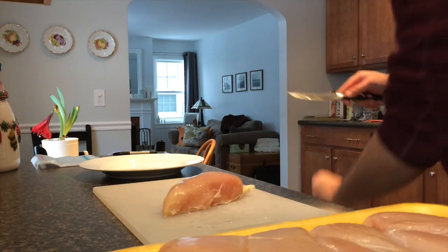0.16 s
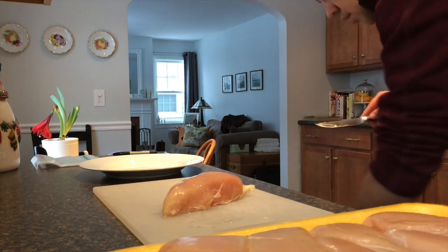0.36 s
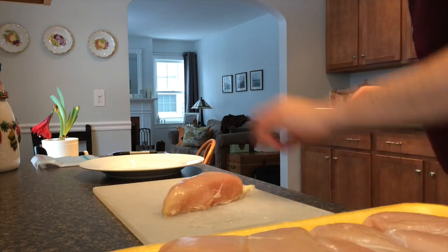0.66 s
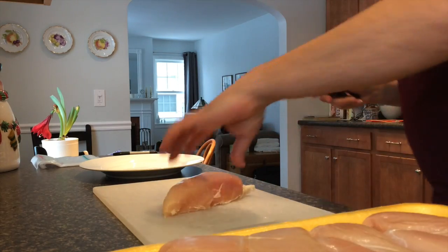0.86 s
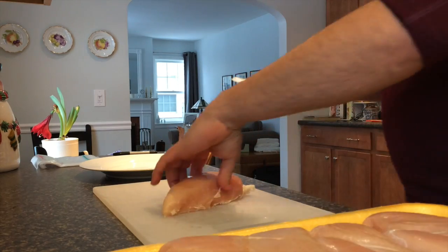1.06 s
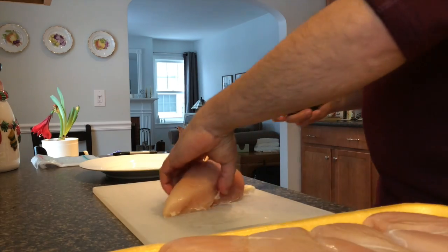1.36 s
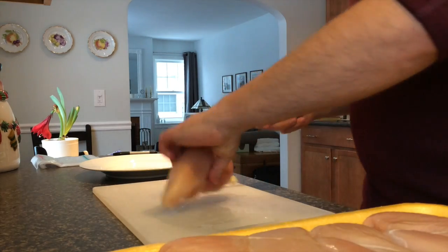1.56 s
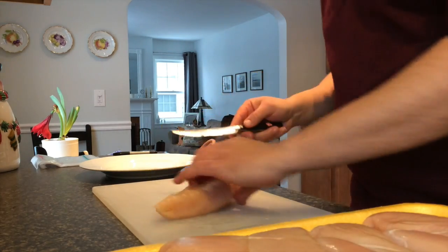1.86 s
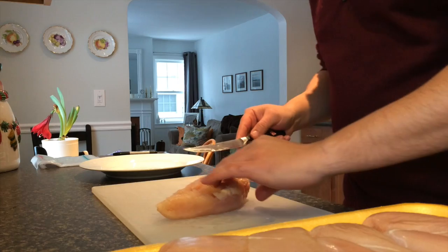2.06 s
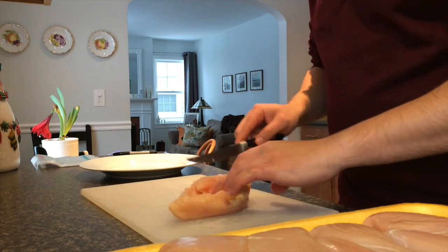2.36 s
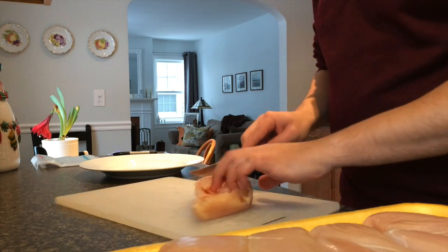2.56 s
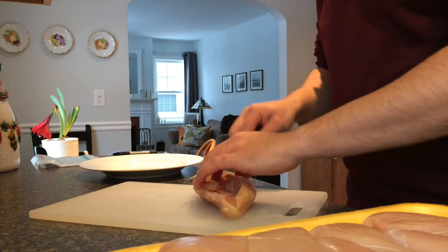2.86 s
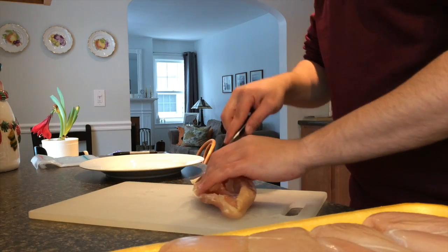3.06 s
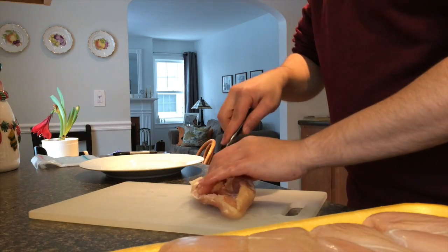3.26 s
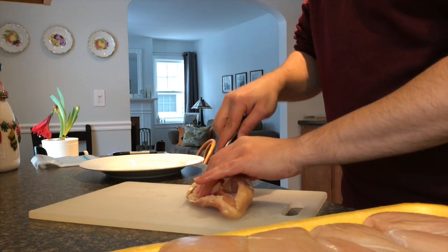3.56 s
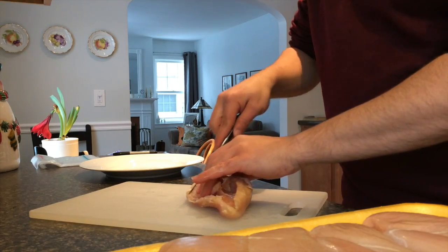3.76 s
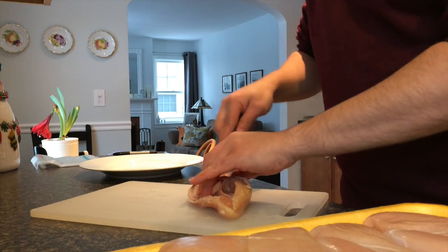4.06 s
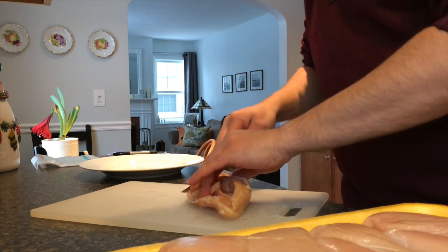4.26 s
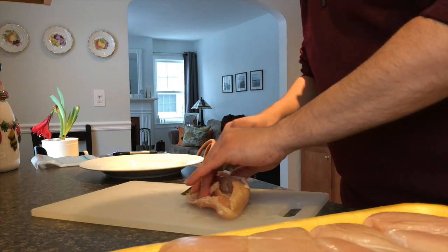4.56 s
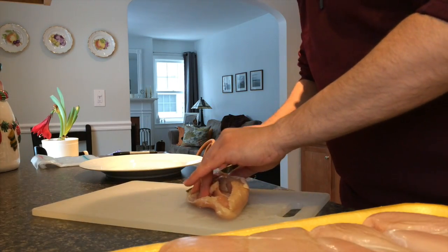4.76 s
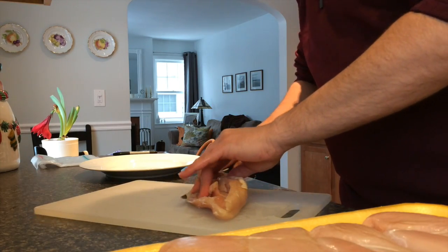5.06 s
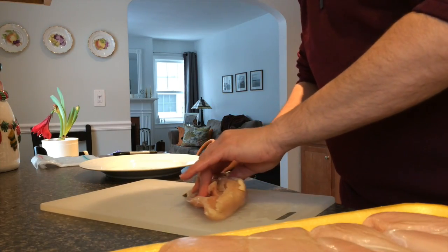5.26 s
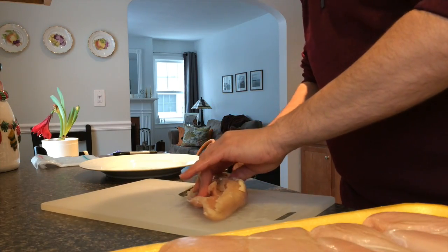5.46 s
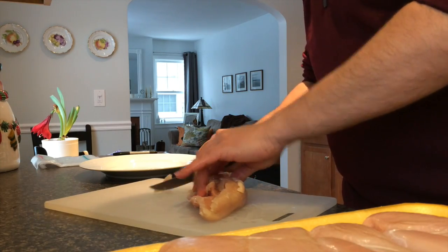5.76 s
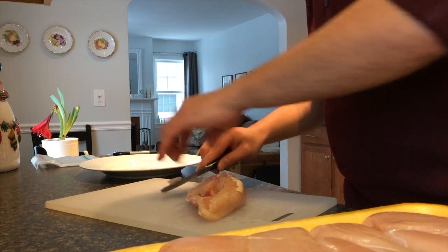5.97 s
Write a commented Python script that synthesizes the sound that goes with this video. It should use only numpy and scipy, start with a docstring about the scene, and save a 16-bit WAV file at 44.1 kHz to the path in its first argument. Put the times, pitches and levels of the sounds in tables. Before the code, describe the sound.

In a quiet kitchen with a faint low appliance hum, shoes knock and a scrap crumples a bin liner. Raw chicken is peeled up and slapped on a plastic board. Close, sticky ticks and soft slicing follow, then a dull thump, bright sinew snaps, light drags and one hard ringing knife scrape.

```python
"""A knife slices wetly into raw chicken, snaps a sinew, drags on a plastic board and ends with one hard scrape.
The cook peels the meat off and slaps it down, shifts his feet and drops a scrap into a bin liner; an appliance hums.
Slices are hiss around a sinking pitch; pops and snaps are struck resonances; the scrape rings board and blade modes.
Smears, drags, steps and crumples are coloured random clicks, smacks are noise bursts, thumps are decaying sines.
Filtered noise makes the clothes, air and hum; a diffuse kitchen echo is mixed in."""
import sys
import numpy as np
from scipy import signal
from scipy.fft import rfft, irfft
from scipy.io import wavfile

SR = 44100
rng = np.random.default_rng(int(sys.argv[2]) if len(sys.argv) > 2 else 0)


def dump(signal):
    """Clip the signal to [-1, 1] and save it as 16-bit WAV at the path in sys.argv[1]."""
    limited = np.clip(np.atleast_2d(signal).T, -1, 1)
    pcm = np.round(limited * 32767).astype(np.int16)
    wavfile.write(sys.argv[1], SR, pcm)


N = 270333
TIME = np.arange(N) / SR
CUTOFF_HZ = 15600


def from_db(db):
    """Decibels to gain."""
    return 10 ** (np.asarray(db) / 20)


def rms_one(x):
    """Scale to unit rms."""
    return x / np.sqrt(np.mean(x ** 2) + 1e-20)


def at_hz(points, hz):
    """Read a table on a log-frequency axis."""
    known_hz, values = np.transpose(points)
    return np.interp(np.log(np.maximum(hz, 1)), np.log(known_hz), values)


def add(out, start_s, sound):
    """Mix a short sound in at start_s."""
    start = int(start_s * SR)
    out[start:start + len(sound)] += sound[:N - start]


def butter(x, order, edge_hz, kind="low"):
    """Butterworth filter."""
    return signal.sosfilt(signal.butter(order, edge_hz, kind, fs=SR, output="sos"), x)


def colour(x, spectrum, size=4096):
    """Minimum-phase filter with the given spectrum; white noise keeps its power."""
    bin_hz = np.arange(size // 2 + 1) * SR / size
    gain = rms_one(from_db(at_hz(spectrum, bin_hz)))
    # fold the cepstrum to make the filter causal
    cepstrum = irfft(np.log(gain))
    cepstrum[1:size // 2] *= 2
    cepstrum[size // 2 + 1:] = 0
    impulse = irfft(np.exp(rfft(cepstrum)))
    return signal.fftconvolve(x, impulse)[:N]


def resonance(x, hz, width_hz):
    """Two-pole band-pass with gain 1 on top."""
    r = np.exp(-np.pi * width_hz / SR)
    feed = np.array([1, 0, -1]) * (1 - r * r) / 2
    back = [1, -2 * r * np.cos(2 * np.pi * hz / SR), r * r]
    return signal.lfilter(feed, back, x + 1e-18)


def grains(per_s, spread_db):
    """Random tiny clicks of uneven size; rms 1."""
    sizes = from_db(spread_db * np.minimum(rng.exponential(1, N), 4))
    signs = rng.choice([-1, 1], N)
    return rms_one(sizes * signs * (rng.random(N) < per_s / SR))


def uneven(per_s, depth_db):
    """A randomly wavering gain of rms 1."""
    knots = rng.standard_normal(int(TIME[-1] * per_s) + 2)
    waver = np.interp(TIME * per_s, np.arange(len(knots)), knots)
    return rms_one(from_db(depth_db * waver))


def swell(peak_s, level_db, length_s, rise_share):
    """A gesture grows smoothly to its peak, then loses 20 dB per length_s; rise_share is a share of length_s."""
    rise_db = 10 * ((TIME - peak_s) / (rise_share * length_s)) ** 2
    fall_db = 20 * (TIME - peak_s) / length_s
    below_db = np.where(TIME < peak_s, rise_db, fall_db)
    return from_db(level_db - np.minimum(below_db, 100))


def swells(rows, rise_share):
    """Gestures of one shape, added in power."""
    return np.sqrt(sum(swell(s, db, length_s, rise_share) ** 2 for s, db, length_s in rows))


def burst(t60_s):
    """A puff of noise that dies away."""
    t = np.arange(int(t60_s * SR) + 2) / SR
    return rng.standard_normal(len(t)) * from_db(-60 * t / t60_s)


def pop(hz, width_hz, spray_db, spray_s):
    """A film or fibre breaks: one sharp crack and a brief noise spray excite a resonance; height 1."""
    force = from_db(spray_db) * burst(spray_s)
    force[0] = 1
    crack = resonance(force, hz, width_hz)
    return crack / np.max(np.abs(crack))


def kitchen_echo(build_s):
    """Diffuse reflections build up, then die at a rate set by frequency; unit energy."""
    # reverberation: hz, t60_s
    room_t60 = [(100, 0.25), (500, 0.3651), (2000, 0.3865), (4000, 0.3579), (8000, 0.2367), (15000, 0.1)]
    t = np.arange(SR // 2) / SR
    edges_hz, tail = np.geomspace(40, 18000, 13), 0
    for low, high in zip(edges_hz, edges_hz[1:]):
        band = butter(rng.standard_normal(len(t)), 2, [low, high], "band")
        tail = tail + band * from_db(-60 * t / at_hz(room_t60, np.sqrt(low * high)))
    tail = tail * (1 - np.exp(-(t / build_s) ** 2))
    return tail / np.sqrt(np.sum(tail ** 2))


def background(air_db):
    """Still room air is coloured noise; an appliance's unsteady low hum is noise through narrow resonances."""
    # air spectrum: hz, relative_db
    air_spectrum = [(25, -18), (60, -6.5), (170, -5), (224, -9.5), (440, -16.5), (770, -23), (2700, -28.5),
                    (6000, -31.5), (15000, -35.5)]
    # appliance hum: pitch_hz, width_hz (of each of two passes), level_db
    hum_bands = [(69.33, 27, -79), (146.62, 25, -74.5), (168.01, 12, -76)]
    hum = 0
    for hz, width_hz, db in hum_bands:
        once = resonance(rng.standard_normal(N), hz, width_hz)
        hum = hum + from_db(db) * rms_one(resonance(once, hz, width_hz))
    return hum + from_db(air_db) * rms_one(colour(rng.standard_normal(N), air_spectrum))


def footsteps():
    """Shoes knock on the floor: dense clicks with a very fast rise."""
    # knocks: peak_s, level_db, length_s
    knock_rows = [(.039, -66, 0.0799), (.28, -58, 0.05142)]
    # floor spectrum: hz, relative_db
    floor_spectrum = [(100, -4.5), (250, 10.5), (450, 0.5), (850, 0), (1400, -1.5), (2500, -12.5),
                      (6000, -36), (15000, -28.5)]
    return swells(knock_rows, rise_share=0.03967) * colour(grains(per_s=3600, spread_db=2.5), floor_spectrum)


def clothes():
    """Clothes rustle as he turns: soft coloured noise."""
    # rustles: peak_s, level_db, length_s
    rustle_rows = [(.075, -75.5, 0.04), (.335, -74.5, 0.2483)]
    rustle = colour(rng.standard_normal(N), [(300, -1.5), (4000, -6.5), (15000, -18.5)])
    return swells(rustle_rows, rise_share=0.4838) * rustle


def bin_liner():
    """A scrap crumples the bin liner: dense uneven clicks."""
    # crumples: peak_s, level_db, length_s
    crumple_rows = [(.554, -44, 0.081736), (.585, -52.5, 0.10645)]
    # liner spectrum: hz, relative_db
    liner_spectrum = [(70, -20), (135, -9), (250, -4), (380, -20.5), (520, -4), (620, -17.5), (700, -2.5),
                      (800, -9), (1100, -9.5), (2800, -9), (7000, -11), (15000, -17.5)]
    return swells(crumple_rows, rise_share=0.20164) * colour(grains(per_s=6000, spread_db=3.5), liner_spectrum)


def thumps(contact_s):
    """A soft push sets the board and, if heavy, the counter swinging for a few low cycles."""
    # weight landing on board and counter: start_s, level_db, pitch_hz
    landings = [(1.1, -45.5, 109.3), (1.537, -50, 151), (1.872, -45.5, 136.4), (1.8972, -37.5, 139.3),
                (1.957, -48.5, 135.5), (4.461, -50.5, 130.4), (4.9339, -41, 119), (4.95, -41, 122)]
    # bending modes of the loaded board: pitch_ratio, relative_db
    bending_modes = [(1, 0), (1.87, -8.5)]
    cycles_to_60db = 11.102
    counter_hz, counter_db = 57, -42  # boom under the hardest landing
    counter_growth = 3.5  # dB of boom per dB of landing
    out, t = np.zeros(N), np.arange(SR // 2) / SR
    hardest_db = max(db for _, db, _ in landings)
    for s, db, hz in landings:
        modes = [(ratio * hz, db + mode_db) for ratio, mode_db in bending_modes]
        modes.append((counter_hz, counter_db + counter_growth * (db - hardest_db)))
        for mode_hz, level_db in modes:
            decay = from_db(level_db - 60 * mode_hz * t / cycles_to_60db)
            swing = decay * np.sin(2 * np.pi * mode_hz * t)
            add(out, s, -swing * (1 - np.exp(-t / contact_s)))
    return out


def smacks():
    """Wet contacts of meat and blade with the board are short noise bursts; the lighter, the duller."""
    # smacks: start_s, level_db
    smack_rows = [(1.106, -60.5), (1.211, -62.5), (1.8694, -56.5), (1.8924, -42.5), (3.829, -57),
                  (4.24, -57), (4.343, -55.5), (4.934, -52.5)]
    # contact spectrum: hz, relative_db
    contact_spectrum = [(400, 0), (850, -6.5), (1400, 2), (1950, -5.5), (2800, 0.5), (3800, -4.5),
                        (5150, -1), (6100, -13.5), (7100, -5), (9000, -16.5), (15000, -6)]
    edge_hz, edge_at_db, db_per_octave = 1583.5, -58, 5.5  # treble edge at a reference level
    out = np.zeros(N)
    for s, db in smack_rows:
        treble_hz = min(edge_hz * 2 ** ((db - edge_at_db) / db_per_octave), CUTOFF_HZ)
        add(out, s, from_db(db) * butter(burst(t60_s=0.050965), 1, treble_hz))
    return colour(out, contact_spectrum)


def drags():
    """Edge and meat drag lightly on the board: clicks of wavering strength."""
    # drags: peak_s, level_db, length_s
    drag_rows = [(1.54, -66, 0.07807), (4.24, -81, 0.289), (4.47, -72.5, 0.0639), (4.88, -77.5, 0.1565),
                 (4.98, -62.5, 0.10393), (5.20, -61, 0.13313), (5.30, -62.5, 0.07396), (5.41, -67.5, .15),
                 (5.485, -61.5, 0.069), (5.53, -61, 0.08007), (5.703, -55.5, 0.05232)]
    # drag spectrum: hz, relative_db
    drag_spectrum = [(40, -11.5), (100, 2.5), (200, -13), (280, -3), (400, -12.5), (600, 0), (900, -12),
                     (1280, -11.5), (1680, -16.5), (2080, -12), (2740, -14), (3500, -21), (12000, -32.5)]
    friction = grains(per_s=4000, spread_db=2.5) * uneven(per_s=70, depth_db=2.5)
    return swells(drag_rows, rise_share=0.43396) * colour(friction, drag_spectrum)


def wet_meat(pop_db):
    """Sticky surfaces tick under the fingers and crackle finely as they slide, with single pops on top."""
    # meat sliding, peeling and parting: peak_s, level_db, length_s
    smear_rows = [(1.29, -76, 0.343), (1.55, -65.5, 0.1078), (1.90, -67, 0.07944), (2.27, -76, 0.1198),
                  (2.56, -76, 0.1452), (3.5, -71, 0.1933), (3.86, -73, 0.0803), (3.96, -77.5, 0.1727),
                  (4.23, -75.5, 0.1653), (4.47, -63.5, 0.124), (4.88, -66.5, 0.1276), (4.955, -61, 0.08932),
                  (5.11, -71, 0.1434), (5.51, -72, 0.1463), (5.92, -72, 0.0545)]
    # wet spectrum: hz, relative_db
    wet_spectrum = [(200, -21), (700, -14), (1500, 3.5), (2500, -2.5), (4500, -0.5), (8000, 1.5),
                    (12000, -0.5), (15000, -4)]
    # louder pops of films and fibres: start_s, level_db (before pop_db), pitch_hz
    loud_pops = [(1.213, -52.5, 4882), (1.647, -51.5, 8480), (2.232, -50, 6658), (2.517, -53.5, 4578),
                 (2.724, -53.5, 6984), (2.947, -54.5, 5614), (3.372, -54, 3000), (3.441, -47.5, 9457),
                 (3.519, -48, 10980), (3.528, -43, 3071), (3.534, -46.5, 3363), (3.831, -46.5, 4999),
                 (3.916, -50, 5446), (4.688, -47.5, 3941), (4.822, -49, 8210), (4.851, -42.5, 8300),
                 (4.935, -41, 7299)]
    # fingers on the meat: start_s, end_s
    handling_s = (1.4, 5.55)
    handling_db = -83
    small_per_s, small_db, small_spread_db, small_hz = 3, -57, 0.5, 6941  # level before pop_db

    crackle = grains(per_s=6000, spread_db=3.2) + from_db(-7) * grains(per_s=400, spread_db=3)
    sliding = swells(smear_rows, rise_share=0.3856) * crackle
    start_s, end_s = handling_s
    handled = (TIME > start_s) * (TIME < end_s)
    sticking = from_db(handling_db) * handled * grains(per_s=700, spread_db=3.5)
    out = colour(sliding + sticking, wet_spectrum)

    small_pops = []
    for when, size, pitch in rng.random((int(small_per_s * (end_s - start_s)), 3)):
        level_db = small_db + small_spread_db * (2 * size - 1)
        small_pops.append((start_s + when * (end_s - start_s), level_db, small_hz * 2 ** (pitch - .5)))
    for s, db, hz in loud_pops + small_pops:
        add(out, s, from_db(db + pop_db) * pop(hz, width_hz=4535, spray_db=-8.5, spray_s=0.021146))
    return out


def sinew():
    """Each snap under the edge is a bright crack and jolts the blade against the board."""
    # snaps: start_s, level_db, pitch_hz, jolt_db (relative share reaching the board)
    snap_rows = [(5.1126, -31.5, 10460, -19.5), (5.146, -35, 9579, -6.5), (5.162, -31, 7756, 0.5),
                 (5.1771, -25, 7874, -5), (5.181, -41, 9013, 0)]
    cracks, jolts = np.zeros(N), np.zeros(N)
    for s, db, hz, jolt_db in snap_rows:
        add(cracks, s, from_db(db) * pop(hz, width_hz=2026, spray_db=-17.0, spray_s=0.007844))
        add(jolts, s, from_db(db + jolt_db - 16.0) * burst(t60_s=0.06177))
    jolt_spectrum = [(200, -2), (600, -1.5), (2500, 5), (7000, -1.5), (11000, -4.5), (15000, -10)]
    return cracks, colour(jolts, jolt_spectrum)


def slicing(skirt_db):
    """Fibres parting along the edge make a hiss around a pitch that sinks during each stroke."""
    # strokes through flesh: peak_s, level_db, length_s, pitch_hz, width_hz
    strokes = [(3.079, -80.5, .8, 3527, 652.8), (3.337, -84, 0.24, 3450, 650),
               (3.531, -73.5, 0.1576, 3242, 1004), (3.844, -70.5, 0.1108, 4200, 2404),
               (3.957, -76, 0.2246, 4275, 2199)]
    entry_sharp, settle_s = 0.074, 0.066  # pitch excess at the peak, decaying as the blade sinks in
    fibres, out = grains(per_s=3100, spread_db=3), 0
    for s, db, length_s, hz, width_hz in strokes:
        core = butter(fibres, 2, width_hz / 2)
        skirt = butter(fibres, 2, 2 * width_hz)
        pitch_hz = hz * (1 + entry_sharp * np.exp(-np.maximum(TIME - s, 0) / settle_s))
        carrier = np.sin(2 * np.pi * np.cumsum(pitch_hz) / SR)
        hiss = rms_one((core + from_db(skirt_db) * skirt) * carrier)
        out = out + swell(s, db, length_s, rise_share=0.1088) * hiss
    return out


def scrape(ring_db, body_db, blade_db, grit_db):
    """The edge bites and the blade chatters, then it rubs over the scored plastic and the board rings on."""
    # a bite, then a slide: peak_s, rub_db, chatter_db, length_s (levels before the mix gains)
    pushes = [(5.724, -30, -23.5, .026), (5.774, -31.2, -35, 0.06948)]
    # rubbed board spectrum: hz, relative_db
    board_spectrum = [(200, -30), (450, -16), (650, -9), (900, 1.5), (1260, -0.5), (1440, -0.5),
                      (1560, -16), (1730, -19), (2080, 3.5), (2500, -3.5), (2800, -3.5), (4000, -17),
                      (6000, -28.5), (15000, -36)]
    # board ringing: pitch_hz, relative_db, t60_s
    board_modes = [(872, -3, 0.3), (958, -5, 0.28), (1071, -6, 0.31), (1152, -8, 0.3), (1249, -3, 0.38),
                   (1873, 0, 0.17), (2051, 0, 0.2), (2304, 0, 0.26), (2762, -9, 0.32), (3004, -10, 0.27),
                   (3074, -16, 0.43), (3354, -13, 0.28), (3790, -14, 0.29), (3984, -8, 0.16)]
    # blade resonances, damped by the hand: pitch_hz, half_width_hz, relative_db
    blade_modes = [(2070, 45, 0), (2780, 37, -7), (3080, 53, -12), (3380, 37, -14), (4000, 38, -15),
                   (4650, 64, -12), (5490, 43, -18)]
    rise_share, glance_db = 0.7339, -14  # glance: lighter rub before the edge catches
    bite_s, lift_s, lift_db_per_s = 5.7105, 5.803, 997.5

    rubbing = swells([(s, db, length_s) for s, db, _, length_s in pushes], rise_share)
    chattering = swells([(s, db, length_s) for s, _, db, length_s in pushes], rise_share)
    touching = from_db(-lift_db_per_s * np.clip(TIME - lift_s, 0, .5))
    caught = TIME > bite_s
    grip = np.where(caught, 1, from_db(glance_db))
    rub = rubbing * touching * grip * grains(per_s=8300, spread_db=2.0)
    chatter = chattering * touching * caught * grains(per_s=9000, spread_db=0.0)

    board, blade = 0, 0
    for hz, db, t60_s in board_modes:
        ring = rms_one(resonance(rub, hz, np.log(1000) / (np.pi * t60_s)))
        board = board + from_db(db) * np.sqrt(t60_s) * ring  # energy in proportion to ring time
    for hz, half_width_hz, db in blade_modes:
        blade = blade + from_db(db) * rms_one(resonance(chatter, hz, 2 * half_width_hz))
    blade = butter(blade, 4, 1900, "high")  # narrow steel radiates no lows
    grit_spectrum = [(200, -19), (550, 0.0), (1700, -8.0), (2400, 16.0), (4500, 7.5), (8000, -5), (15000, -43.5)]
    grit = colour(chatter, grit_spectrum)

    rasp = from_db(body_db) * colour(rub, board_spectrum) + from_db(grit_db) * grit
    board_ring = from_db(ring_db) * np.std(rub) * rms_one(board)
    blade_ring = from_db(blade_db) * np.std(chatter) * rms_one(blade)
    return rasp, board_ring + blade_ring


def scene():
    """Close sounds are nearly dry; the floor, the bin and the radiating board fill the room."""
    far = footsteps() + clothes() + bin_liner()
    knocks = smacks() + thumps(contact_s=0.002921)
    cracks, jolts = sinew()
    rasp, rings = scrape(ring_db=-6.0, body_db=-4, blade_db=-3.5, grit_db=-12.0)
    close = wet_meat(pop_db=-3.5) + cracks + slicing(skirt_db=-16)
    board = drags() + jolts + rasp
    sent = from_db(-13.0) * close + from_db(-11.5) * knocks + from_db(-3) * board + from_db(-3.0) * far
    echo = signal.fftconvolve(sent, kitchen_echo(build_s=0.005407))[:N]
    direct = close + knocks + rings + from_db(2.0) * board + from_db(2.5) * far
    return direct + echo + background(air_db=-71.5)


def record(dry):
    """The small microphone loses the deepest bass; the top is cut steeply."""
    thinned = butter(dry, 3, 32, "high")
    top_cut = signal.ellip(10, .2, 70, CUTOFF_HZ, fs=SR, output="sos")
    return signal.sosfilt(top_cut, thinned)[None, :]


dry = scene()
out = record(dry)
dump(out)
```